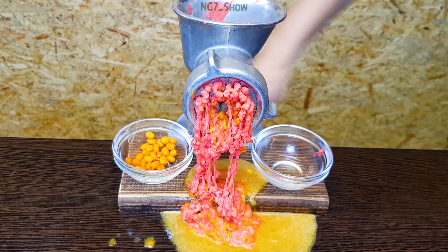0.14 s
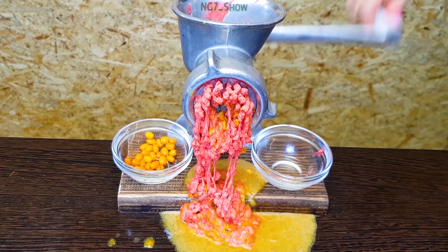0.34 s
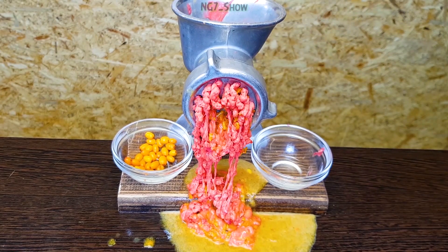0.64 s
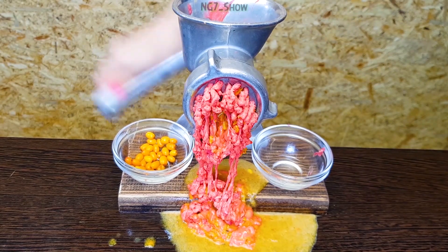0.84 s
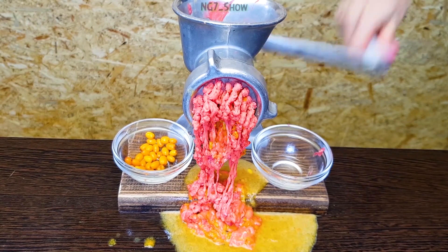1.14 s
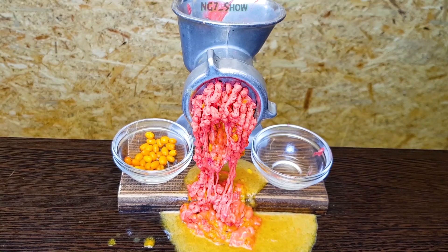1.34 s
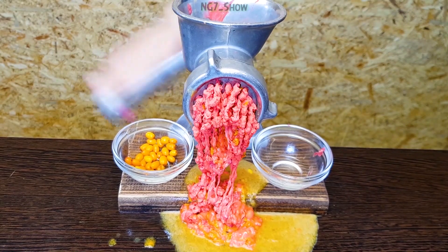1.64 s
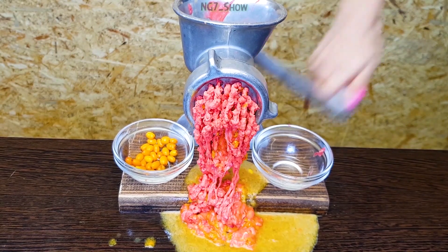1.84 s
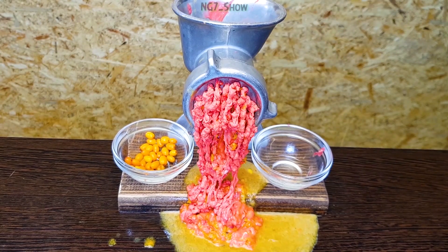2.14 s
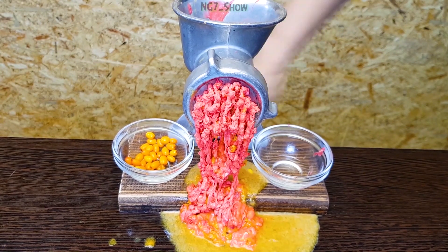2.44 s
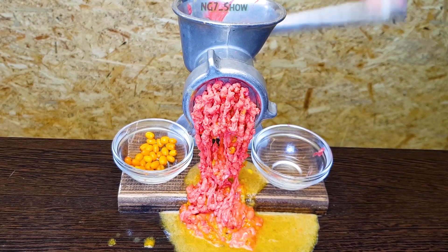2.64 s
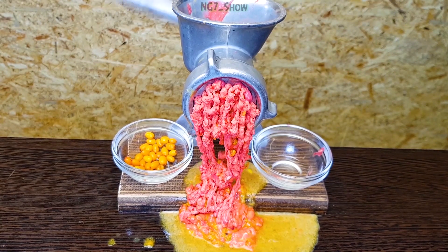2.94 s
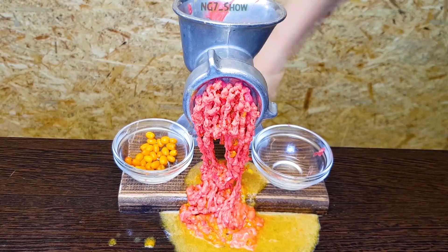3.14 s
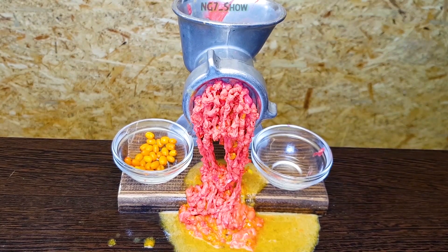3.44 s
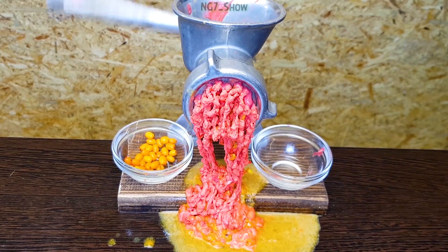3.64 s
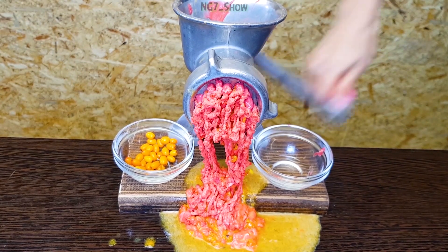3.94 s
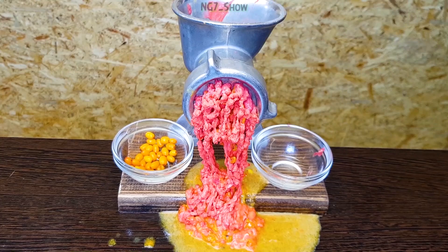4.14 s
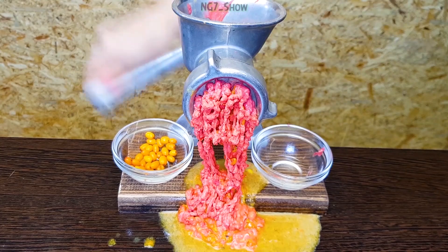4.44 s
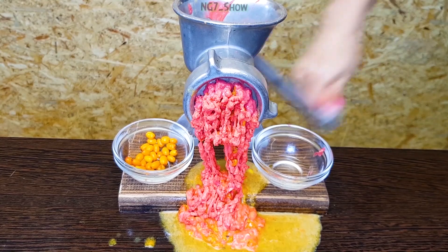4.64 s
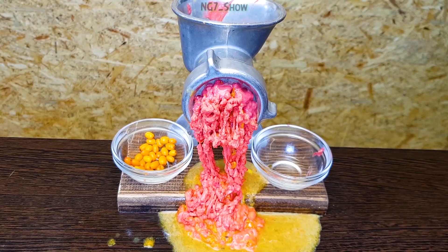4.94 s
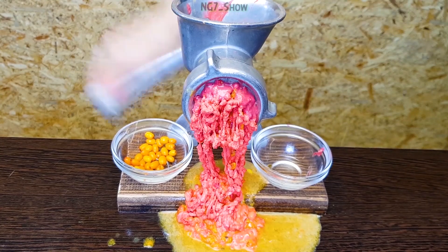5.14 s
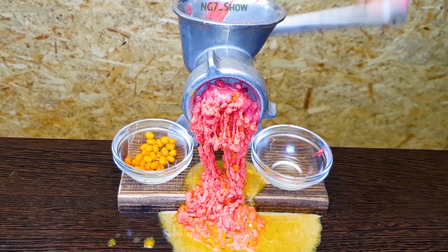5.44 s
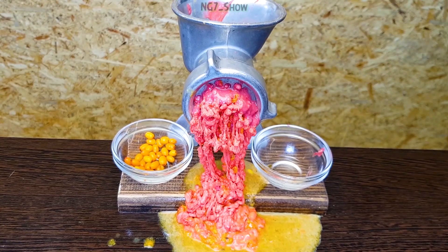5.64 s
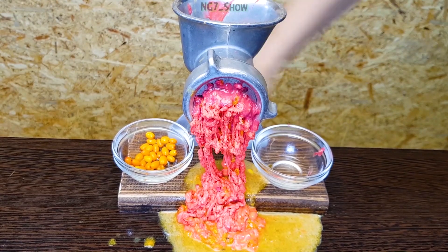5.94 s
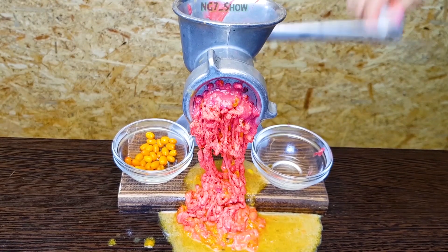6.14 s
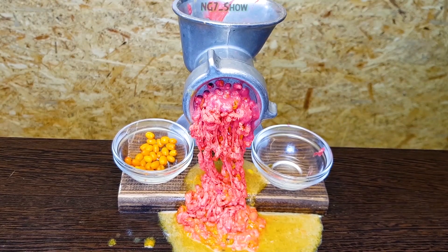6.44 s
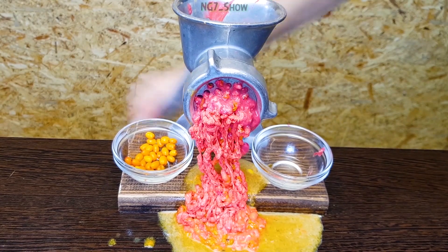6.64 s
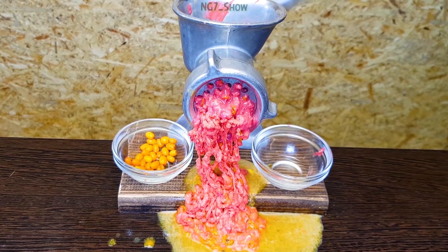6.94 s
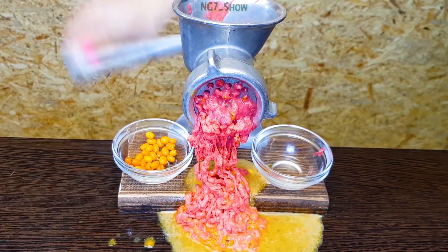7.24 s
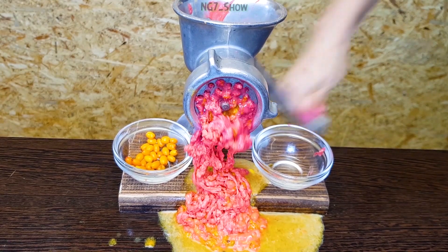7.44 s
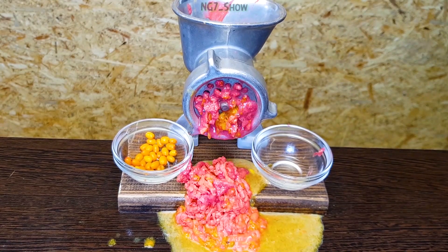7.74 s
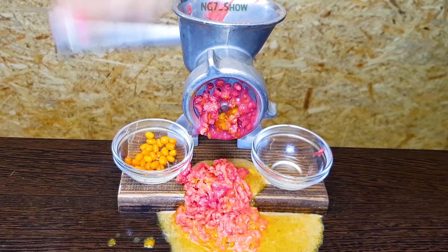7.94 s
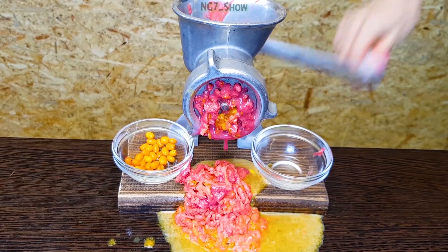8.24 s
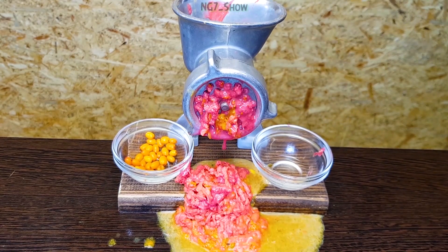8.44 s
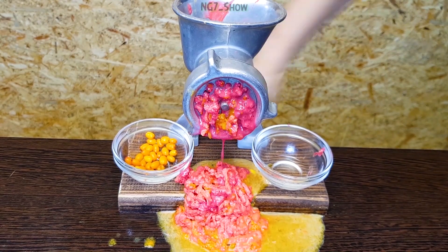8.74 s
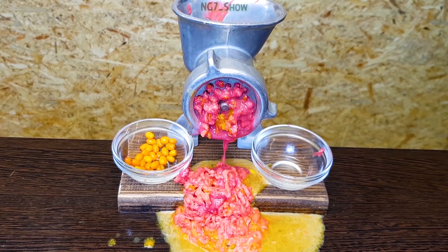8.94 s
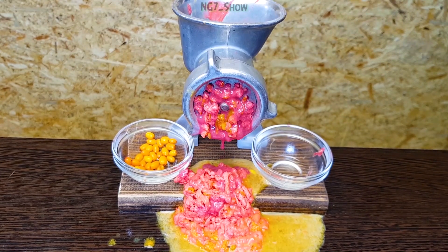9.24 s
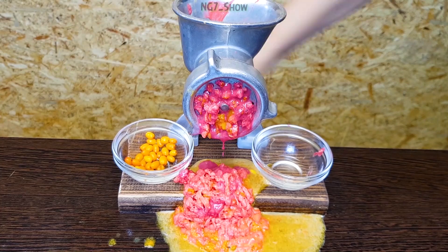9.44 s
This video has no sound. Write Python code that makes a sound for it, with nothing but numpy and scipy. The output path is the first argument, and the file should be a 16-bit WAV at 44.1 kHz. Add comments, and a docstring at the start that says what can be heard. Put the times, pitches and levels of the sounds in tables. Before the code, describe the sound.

Close microphone, small indoor room with a short echo. Sticky slime with hard little beads is forced out of a metal grinder: a wet, hollow scrape, bright fizzing and irregular snaps and pops. Loose crank knocks and low wooden rumbles grow stronger midway as the fizz fades. Toward the end it is sparser, with soft squelches, thin hisses and one strong thump before silence.

```python
"""A wet scrape, sharp snaps and a low tremble open the scene: a hand-cranked metal grinder clamped to a wooden
table pushes beaded slime through its plate, close to a microphone. Resonators driven by noise and pushes give
the table's shake and the barrel's scrape; decaying tones give popping air pockets and snapping beads.
Play in the crank knocks, squeezed slime hisses in narrow bands, and the sound fades out before the end."""
import sys
import numpy as np
from scipy import signal
from scipy.fft import rfft, irfft, next_fast_len
from scipy.io import wavfile
from scipy.ndimage import uniform_filter1d, map_coordinates

SR = 44100
rng = np.random.default_rng(int(sys.argv[2]) if len(sys.argv) > 2 else 0)


def wav_record(signal):
    """Record a signal, one row per channel, as 16-bit PCM in the file named by sys.argv[1]."""
    frames = np.transpose(np.atleast_2d(signal))
    bounded = np.clip(frames, -1, 1)
    # unit amplitude maps onto the largest positive 16-bit level
    quanta = np.round(bounded * 32767).astype(np.int16)
    wavfile.write(sys.argv[1], SR, quanta)


N = 423801

# The screw's steady work. Each row: time in seconds, base levels in dB of barrel scrape, fine crackle
# and table shake.
WORK = [(0.0, -34, -31.5, -39.5), (0.29, -39, -34, -38.5), (1.56, -33, -32, -33), (2.25, -41.5, -42, -34.5),
        (2.85, -37.5, -37, -30), (3.24, -39, -46.5, -48), (3.65, -31.5, -45, -28.5),
        (4.44, -41.5, -55, -39), (4.68, -32, -38, -23.5), (4.97, -44.5, -56, -34.5),
        (5.42, -32.5, -47, -36), (5.62, -34.5, -57, -31.5), (6.19, -47, -67, -53),
        (6.82, -37.5, -42.5, -33.5), (7.39, -43.5, -62, -47), (7.78, -46.5, -59, -37),
        (8.14, -44, -63, -41), (8.62, -52.5, -56, -41.5)]
# Knocks of the crank's play. Each row: start in seconds, relative levels in dB of dull rattle, table thump
# and barrel clack, pitch of the dull rattle in Hz.
KNOCKS = [(0.168, -31, -40, -5.5, 796), (0.928, -23, -45, -19.5, 378), (1.018, -27.5, -45, -22, 373),
          (1.143, -40, -39, -13.5, 745), (1.677, -29, -53, -17.5, 810), (2.097, -27, -36, -24, 208),
          (2.329, -38, -46, -17.5, 607), (2.4, -32, -46, -11, 860), (2.564, -30, -22, -37, 560),
          (2.748, -54, -17, -39, 225), (2.793, -25.5, -2.5, -37, 502), (2.91, -27, -49, -13, 211),
          (3.1, -25.5, -30, -24, 683), (3.298, -34, -30, -47, 202), (3.58, -35, -7, -20, 214),
          (3.647, -23.5, -16, -15, 199), (3.66, -11, -17, -21, 221), (3.918, -26.5, -38, -29.5, 906),
          (4.15, -54.5, -39, -17.5, 216), (4.552, -14.5, -21.5, -27, 220), (4.603, -12, 3, -30.5, 876),
          (4.934, -31, -8.5, -35, 202), (5.121, -25.5, -6, -52, 298), (5.834, -16, -11, -12, 362),
          (6.547, -14, -4, -8, 219), (6.699, -25.5, -25, -21, 225), (6.816, -31, -38, -36, 573),
          (7.038, -25, -24, -20, 203), (7.158, -24, -7, -16.5, 642), (7.872, -32.5, -32, -21, 260),
          (8.005, -30, -39, -11.5, 860), (8.323, -8.5, 9, -10.5, 228)]
# Air pockets bursting in the slime. Each row: start in seconds, relative level in dB, starting pitch in Hz.
POPS = [(0.045, -13, 2290), (0.159, -18.5, 3440), (0.173, -15, 1470), (0.325, -18.5, 1300),
        (0.353, -10, 1470), (0.5295, -9, 2420), (0.6289, -9.5, 2450), (0.7584, -8.5, 2600),
        (0.856, -12, 3070), (0.922, -20.5, 1260), (0.9493, -7, 2720), (1.021, -19.5, 1210),
        (1.1448, -11.5, 2550), (1.4093, -11.5, 1320), (1.499, -18.5, 1230), (1.504, -6, 2280),
        (1.9155, -17.5, 1280), (2.0945, -13.5, 1306), (2.2517, -14, 3140), (2.566, -27.5, 1190),
        (2.6211, -13, 1340), (2.7513, -14, 3150), (2.795, -8, 1315), (3.3545, -12, 1290),
        (3.454, -6.5, 1340), (3.6329, -10, 1770), (3.6614, -9, 1630), (3.832, -14, 2060),
        (3.9212, -0.5, 1980), (4.064, -17, 1880), (4.5438, -15.5, 2790), (4.6049, -5, 1200),
        (4.66, -21.5, 1160), (4.708, -20, 1200), (4.7478, -11, 1290), (4.782, -20, 1300),
        (4.811, -21, 1270), (4.8345, -10.5, 1320), (4.9309, -14, 1300), (5.236, -17, 1730),
        (5.248, -3.5, 1890), (5.3034, -19.5, 1960), (5.3437, -17, 1700), (5.412, -19, 1800),
        (5.421, -18, 1850), (5.466, -21, 1500), (5.5295, -12, 1640), (5.5533, -13.5, 1910),
        (5.8358, -5.5, 1246), (6.209, -17.5, 2750), (6.24, -18.5, 1310), (6.4203, -17, 1870),
        (6.5357, -8, 1240), (6.6658, -19, 2440), (6.6836, -17.5, 1810), (6.7013, -19, 1830),
        (6.821, -15.5, 3300), (6.8418, -14, 1940), (6.877, -22, 2050), (7.037, -11, 1360),
        (7.053, -9, 1340), (7.1578, -21, 970), (7.5939, -16.5, 1310), (7.7067, -12.5, 1310),
        (7.885, -24, 2980), (8.0065, -19, 2340), (8.057, -21, 2300), (8.2422, -23, 1240),
        (8.317, -6.5, 1200), (8.562, -30.5, 1500), (8.6247, -26, 1290)]
# Beads and thin films snapping. Each row: start in seconds, relative level in dB, pitch in Hz,
# top edge in dB relative to that level.
SNAPS = [(0.0253, -7.5, 6400, -29.5), (0.031, -8, 7400, -21.5), (0.133, -6, 6850, -0.5),
         (0.1546, -15, 8650, -10), (0.1678, -8.5, 6400, -16), (0.1777, -8.5, 4080, -23),
         (0.1908, -6.5, 8000, -18.5), (0.4042, -12, 4320, -43), (0.506, -14, 6500, -9),
         (0.597, -12.5, 11500, -5), (0.6011, -8, 6660, -15), (0.618, -6.5, 7400, -15),
         (0.635, -10, 7150, -6), (0.7525, -10, 5700, -30.5), (0.765, -4, 6020, -34),
         (0.7886, -14, 7470, -6), (0.832, -16, 12600, -5), (0.854, -12.5, 10200, -9),
         (0.8566, -7.5, 7750, -19), (0.9229, -7.5, 6800, -6), (0.9455, -15.5, 5900, -1.5),
         (0.984, -20, 6200, -19), (1.0457, -14.5, 8500, -7), (1.1453, -11.5, 6050, -35),
         (1.1855, -17, 6940, -24.5), (1.3463, -18.5, 4260, -6), (1.3848, -10.5, 5260, -17),
         (1.4082, -15, 11750, -4), (1.4325, -14.5, 11000, -9), (1.5299, -23, 10500, 4),
         (1.587, -19.5, 6100, -12), (1.638, -20, 3970, -2), (1.749, -10.5, 3540, -8),
         (1.7985, -17, 5970, -16), (2.2533, -9.5, 4050, -39), (2.5388, -20, 6300, -12),
         (2.5662, -14.5, 4350, -23), (2.754, -11, 6100, -17), (2.7576, -11, 6300, -24),
         (2.8482, -13, 6930, -18), (3.051, -29, 10560, -10.5), (3.1287, -12.5, 6130, -42),
         (3.314, -18, 3330, -40), (3.4118, -16.5, 6370, -10), (3.424, -21.5, 6200, -6),
         (3.526, -18.5, 4100, -42), (3.599, -16, 6300, -33), (3.6154, -18, 7530, -6.5),
         (3.6616, -14.5, 7140, -13), (3.6655, -19, 3960, -14), (3.757, -18.5, 15000, -7.5),
         (3.773, -16.5, 7770, -14), (4.0126, -19.5, 6400, -13), (4.0712, -23, 4260, -42.5),
         (4.176, -25, 4020, -55), (4.547, -18, 7900, -15), (4.6036, -13.5, 3550, -4),
         (4.6245, -10.5, 6100, -18), (4.6445, -19, 3980, -4), (5.054, -29, 9800, -5),
         (5.3644, -34.5, 9600, -10.5), (5.473, -25, 8470, -21.5), (5.5793, -32.5, 9740, -13),
         (5.8352, -21.5, 3600, -41), (6.1737, -33.5, 8630, 0), (6.368, -32, 6650, -28),
         (6.537, -10.5, 3400, -14), (6.5426, -13, 7500, -21), (6.5496, -19, 3720, -9),
         (6.8198, -12, 4120, -42), (6.8416, -28, 3870, -31), (7.038, -16.5, 3470, -44),
         (7.1605, -17.5, 3580, -20), (7.5366, -21.5, 3950, -42), (7.881, -21, 7600, -32),
         (7.884, -26, 6970, -33.5), (8.277, -27, 11200, -8.5), (8.2816, -18.5, 7940, -12),
         (8.318, -7.5, 3560, -10.5), (8.339, -22, 3700, -14.5), ]
# Resonances of the table, the legs' sway first. Each row: frequency in Hz, width in Hz, gain in dB.
TABLE_MODES = [(68.8, 22, 5.5), (135.2, 16, 11.5), (163.6, 27, 4.5), (216.7, 30, -3.5), (353, 61, -15),
               (480, 64, -14)]


def amp(db):
    """Decibels are logarithmic: 20 dB is a factor of ten in amplitude."""
    return 10 ** (np.asarray(db) / 20)


def unit(x):
    """Normalisation by effective value: x at rms 1."""
    return x / np.sqrt(np.mean(x ** 2) + 1e-20)


def along(points, hz):
    """Logarithmic frequency scale: (Hz, value) points interpolated by pitch interval."""
    f, v = np.transpose(points)
    return np.interp(np.log(hz + 1), np.log(f + 1), v)


def curves(rows):
    """Linear interpolation: one value per sample for each column after the time."""
    s, *cols = np.transpose(rows)
    return [np.interp(np.arange(N) / SR, s, c) for c in cols]


def wobble(rate):
    """Slow random modulation: a smooth curve through random knots, rate of them a second."""
    knots = rng.standard_normal(int(N * rate / SR) + 4)
    return map_coordinates(knots, [np.arange(N) * rate / SR])


def swells(base_db, times, peaks_db, rise_s, t60_s):
    """Incoherent sounds add as powers: gain of a steady level plus a quick rise and slow fall per event."""
    t, starts = np.arange(SR // 2) / SR, np.zeros(N)
    np.add.at(starts, np.round(np.asarray(times) * SR).astype(int), amp(peaks_db) ** 2)
    shape = ((1 - np.exp(-t / rise_s)) * amp(-60 * t / t60_s)) ** 2
    event_power = np.abs(signal.fftconvolve(starts, shape)[:N])
    return np.sqrt(amp(base_db) ** 2 + event_power)


def filtered(x, response):
    """Linear filtering: the spectrum of x times a complex response of frequency."""
    m = next_fast_len(N + SR // 2)
    return irfft(rfft(x, m) * response(np.fft.rfftfreq(m, 1 / SR)), m)[..., :N]


def modes(table, size=1):
    """Modal superposition: causal resonances; groups of size move in step and alternate in sign."""
    def response(f):
        total = 0
        for k, (centre, width, db) in enumerate(table):
            damping = 1j * f * width
            total = total + (-1) ** (k // size) * amp(db) * damping / (centre * centre - f * f + damping)
        return total
    return response


def patchy(x, depth_db):
    """Time-varying filtering: x with drifting random patches of gain in time and frequency."""
    z = signal.stft(x, nperseg=256)[2]
    across_pitch = uniform_filter1d(rng.standard_normal(z.shape), size=3, axis=0)
    field = uniform_filter1d(across_pitch, size=24, axis=1)
    return signal.istft(z * amp(depth_db * unit(field)), nperseg=256)[1][:N]


def add(track, s, sound):
    """Superposition: mixes a sound into the track at s seconds."""
    track[round(s * SR):][:len(sound)] += sound


def barrel(x):
    """Cavity radiation: resonances act twice, the small mouth holds back bass, wet walls soak up treble."""
    # Each row: frequency in Hz, width in Hz, gain in dB of one of the two passes.
    barrel_modes = [(1206, 420, 8), (1840, 550, 1.5), (2760, 100, -5), (3650, 380, -7)]
    resonances = modes(barrel_modes, size=2)

    def response(f):
        mouth = 1j * f / (1500 + 1j * f)
        walls = 1 / (1 + 1j * f / 6000) ** 2
        return resonances(f) ** 2 * mouth ** 3 * walls
    return filtered(x, response)


def bubbles(count, low_hz, span, cycles, spread_db, size):
    """Granular superposition: small bursts, each a few rising cycles at its own pitch; the sum has rms 1."""
    when, pitch, chance = rng.random((count, 3)).T
    hz, t = low_hz * span ** pitch[:, None], np.arange(size) / SR
    gain = amp(-spread_db * np.log(0.0077 + chance))[:, None] * np.sqrt(hz)  # a few stand out
    age = t * hz / cycles
    grains = gain * np.sin(2 * np.pi * hz * t * (1 + 0.0053 * age)) * age * np.exp(-age)
    place = (when * N).astype(int)[:, None] + np.arange(size)
    return unit(np.bincount(place.ravel(), grains.ravel(), N + size)[:N])


def grinding():
    """Noise shaped by resonance: pockets squelch in the barrel, thin films tick and hiss at the plate."""
    # Spectrum of the crackle. Each row: frequency in Hz, relative gain in dB.
    crackle_gains = [(1470, -18), (2500, 4.5), (3500, -3), (4700, -8), (6050, -0.5), (8100, -6.5),
                     (9720, -13), (11700, -9.5), (13900, -23), (16500, -34)]
    # Thin rings of the metal plate. Each row: frequency in Hz, width in Hz, gain in dB.
    plate_modes = [(3850, 9.8, -2.5), (6420, 110, 5.5), (7600, 46, 2), (11200, 300, -18.5)]
    scrape_db, crackle_db, _ = curves(WORK)

    # Slime keeps moving after a knock, pop or snap; trail levels are relative to its table level.
    trail_rise_s, squelch_t60_s, fizz_t60_s = 0.00052, 0.15, 0.16
    knock_trail_db, pop_trail_db, snap_trail_db = -9.5, -28.5, -16.5
    bursts = [(s, db + knock_trail_db) for s, db, *_ in KNOCKS]
    bursts += [(s, db + pop_trail_db) for s, db, _ in POPS]
    scraping = swells(scrape_db, *np.transpose(bursts), trail_rise_s, squelch_t60_s)
    s, db, hz, edge_db = np.transpose(SNAPS)
    dull_db = 4 * np.log2(np.minimum(hz / 6000, 1))  # 4 dB lost per octave below 6 kHz
    crackling = swells(crackle_db, s, db + snap_trail_db + dull_db, trail_rise_s, fizz_t60_s)
    # only bright snaps leave a bright trail, 6.5 dB under their top edge
    spitting = swells(crackle_db - 1.5, s, db + edge_db - 6.5, trail_rise_s, fizz_t60_s)

    squelch = bubbles(count=7000, low_hz=853.0, span=5.0, cycles=1.09, spread_db=3.5, size=256)
    squelch = squelch + 2.27 * rng.standard_normal(N)
    scrape = unit(patchy(barrel(squelch), depth_db=3.5))

    ticks = bubbles(count=6000, low_hz=2810, span=4.36, cycles=0.55, spread_db=3.5, size=96)
    # ticks start 3 dB over the hiss and lose 0.094 dB for each dB that the crackle falls
    ticks_db = 3 + 0.094 * (crackle_db - crackle_db[0])
    fizz = amp(ticks_db) * ticks + rng.standard_normal(N)
    fizz = fizz + amp(-4.5) * filtered(fizz, modes(plate_modes))
    coloured = filtered(fizz, lambda f: amp(along(crackle_gains, f)) * np.minimum(f / 1500, 1) ** 3)
    crackle = unit(patchy(coloured, depth_db=3.2))
    low = filtered(crackle, lambda f: 1 / (1 + (f / 8300) ** 10))
    high = crackle - low
    scrape_part = scraping * amp(0.99 * wobble(17)) * scrape
    return scrape_part + amp(2.8 * wobble(20)) * (crackling * low + spitting * high)


def shake():
    """Forced vibration: uneven load makes the legs sway and the board hum, rung anew by each jolt."""
    # The crank catches and jerks the table. Each row: start in seconds, relative levels in dB of
    # board hum and leg sway.
    jolts = [(0.561, -25.5, -30.5), (0.684, -28, -31), (1.362, -16.5, -22), (1.909, -22, -31),
             (2.08, -17.5, -28), (2.298, -26, -42), (2.585, -21.5, -34), (2.794, -11.5, -40),
             (2.921, -13.5, -32), (3.001, -16.5, -40), (3.083, -25.5, -28), (3.157, -20.5, -29),
             (3.302, -16.5, -40), (3.359, -20.5, -24), (3.456, -9, -29), (3.628, -15, -14.5),
             (3.679, -8.5, -22), (4.15, -9, -20), (4.269, -15.5, -31.5), (4.552, -13, -17.5),
             (4.614, -4, -16), (4.771, -17, -28), (4.808, -23, -39), (4.932, -28, -24), (5.048, -23.5, -32),
             (5.12, -22.5, -29), (5.675, -17.5, -28.5), (5.833, -15.5, -38.5), (6.037, -24, -47),
             (6.168, -20, -33.5), (6.233, -30.5, -32.5), (6.438, -27, -50), (6.543, -9, -22),
             (6.693, -19, -31), (6.923, -22.5, -30), (7.043, -16.5, -35), (7.178, -28, -54),
             (7.467, -23, -34.5), (7.592, -22.5, -32), (7.709, -19, -31), (7.859, -21, -41),
             (8.344, -11.5, -23), (8.627, -22, -29.5), (8.692, -18.5, -47)]
    load_db = curves(WORK)[-1]
    s, hum_db, sway_db = np.transpose(jolts)

    legs, board = modes(TABLE_MODES[:1]), modes(TABLE_MODES[1:3])
    upper = modes(TABLE_MODES[3:] + [(945, 350, -28.5)])
    sway = unit(filtered(rng.standard_normal(N), lambda f: legs(f) / (1 + (f / 130) ** 2)))
    hum = unit(filtered(rng.standard_normal(N), lambda f: board(f) / (1 + (f / 230) ** 4)))
    creak = unit(filtered(rng.standard_normal(N), upper))
    lumps = amp(-18.5 + 5.6 * wobble(7.2))  # upper board modes answer in lumps

    ring_hum_db, ring_sway_db = 44.5, 52  # push gain that rings board and legs at a jolt's level
    pushes = np.zeros((2, N))
    pushes[:, np.round(s * SR).astype(int)] = amp([hum_db + ring_hum_db, sway_db + ring_sway_db])
    push_s = 0.0047  # a push spans about four time constants of its smoothing
    soft = lambda f: 1 / (1 + 2j * np.pi * f * push_s / 4) ** 2
    board_ring = filtered(pushes[0], lambda f: board(f) * soft(f))
    leg_ring = filtered(pushes[1], lambda f: legs(f) * soft(f))

    # steady shares of the load are -4.5 and -4 dB; the trembling after a jolt is 2 and -4.5 dB re the jolt
    rise_s, t60_s = 0.012, 0.33
    swaying = swells(load_db - 4.5, s, sway_db + 2, rise_s, t60_s)
    humming = swells(load_db - 4, s, hum_db - 4.5, rise_s, t60_s)
    return board_ring + leg_ring + swaying * sway + humming * (hum + lumps * creak)


def snaps():
    """Sudden release of tension: a few milliseconds of ragged ring at one pitch, with a thin treble edge."""
    out, edge, t = np.zeros(N + SR), np.zeros(N + SR), np.arange(SR // 14) / SR
    sizzle_db, sizzle_t60_s = -19, 0.12  # narrow hiss left at the snap's own pitch
    for s, db, hz, edge_db in SNAPS:
        noise = rng.standard_normal((2, len(t)))
        ragged = unit(uniform_filter1d(uniform_filter1d(noise[0], size=16), size=16))
        flutter = 1 + 0.3 * ragged
        shape = (1 - np.exp(-t / 0.00029)) ** 2 * amp(db - 60 * t / 0.0052)
        sizzle = amp(db + sizzle_db - 60 * t / sizzle_t60_s) * np.minimum(t * 1000, 1) * ragged
        click = amp(db + 5.0) * hz * t * np.exp(-hz * t / 0.69)  # the first cycle or two stand out
        add(out, s, (amp(5.5) * shape * flutter + click + sizzle) * np.sin(2 * np.pi * hz * t))
        edge_shape = amp(db + edge_db + 4.0 - 60 * t / 0.015) * (1 - np.exp(-t / 0.00034))
        add(edge, s, edge_shape * noise[1])
    treble = signal.butter(3, [9000, 13800], "band", fs=SR, output="sos")
    return out[:N] + signal.sosfilt(treble, edge)[:N]


def pops():
    """Damped bubble oscillation: a bursting pocket rings a few rising cycles and nudges the barrel."""
    out, nudge, t = np.zeros(N + SR), np.zeros(N), np.arange(SR // 16) / SR
    for s, db, hz in POPS:
        age = t * (hz / 1300) ** 1.2 / 0.0014  # small pockets die much sooner
        tone = np.sin(2 * np.pi * hz * t * (1 + 3.0 * t) + rng.uniform(0, 2 * np.pi))
        add(out, s, amp(db + 6.5) * age * np.exp(-age) * tone)
        nudge[round(s * SR)] += amp(db + 15.5)
    return out[:N] + barrel(nudge)


def knocks():
    """Impact excitation: a knock thumps the table, clacks in the barrel and leaves a dull rattle and gulp."""
    thump, clack, rattle = np.zeros(N), np.zeros(N + SR), np.zeros(N + SR)
    t = np.arange(SR // 8) / SR
    gulp_db, gulp_t60_s = 4.5, 0.059  # pitched part of the rattle re its noise
    gulp_sag = 2.7  # per second; in the phase, so the pitch falls at twice this share
    for s, db, thump_db, clack_db, hz in KNOCKS:
        burst = rng.standard_normal((2, len(t)))
        # parts rebound unevenly: a new random gain every 128 samples
        steps = np.repeat(rng.standard_normal(len(t) // 128 + 1), 128)[:len(t)]
        chatter = amp(1.82 * steps)
        dull = signal.butter(2, [hz / 1.3, max(hz * 1.4, 750)], "band", fs=SR, output="sos")
        add(thump, s + 0.0035, amp(thump_db + 28.5) * np.hanning(60) / 30)  # a soft push through the clamp
        add(clack, s, amp(clack_db + 2.5 - 60 * t / 0.031) * chatter * burst[0])
        gulp = amp(gulp_db - 60 * t / gulp_t60_s) * np.sin(2 * np.pi * hz * t * (1 - gulp_sag * t))
        loose = unit(signal.sosfilt(dull, burst[1])) * amp(-60 * t / 0.11)
        add(rattle, s, amp(db - 4.5) * (gulp + loose) * (1 - np.exp(-t / 0.0024)))
    return filtered(thump, modes(TABLE_MODES)) + barrel(clack[:N]) + rattle[:N]


def room(x):
    """Frequency-dependent reverberation: each band dies at its own speed; the tail is redrawn every third
    of a second."""
    # Each row: frequency in Hz, time to fall 60 dB in seconds.
    decay_times = [(450, 0.11), (1100, 0.29), (3000, 0.18), (8000, 0.12), (14000, 0.047)]
    out, hop = np.zeros(N + SR), SR // 3
    for start in range(0, N, hop):
        hz, t, z = signal.stft(rng.standard_normal(SR // 4), SR, nperseg=128)
        decay = amp(-60 * t / along(decay_times, hz)[:, None])
        tail = signal.istft(z * decay, SR, nperseg=128)[1]
        answer = signal.fftconvolve(x[start:start + hop], tail / np.linalg.norm(tail))
        add(out, start / SR + .003, answer)
    return out[:N]


def squeezes():
    """Flow noise through a gap: a narrow, sputtering hiss that starts quickly and thins out."""
    # Each row: start in seconds, length in seconds, pitch in Hz, level in dB before shaping.
    gaps = [(4.506, 0.057, 2640, -31), (4.553, 0.069, 3630, -38), (4.612, 0.1, 1176, -26),
            (4.657, 0.12, 3700, -38), (4.809, 0.014, 3690, -31), (5.291, 0.093, 4900, -47.5),
            (6.69, 0.36, 5300, -54.5), (6.839, .11, 3530, -44), (7.843, 0.057, 2850, -39.5),
            (8.178, .035, 4820, -44), (8.468, 0.026, 3150, -50), (8.606, 0.05, 3430, -49)]
    half_width = 0.061  # half the band, as a share of the pitch
    out = np.zeros(N + SR)
    for s, length, hz, db in gaps:
        noise = rng.standard_normal(SR // 3)
        u = np.arange(SR // 3) / SR / length  # 0 to 1 through the squeeze
        edges = [hz / (1 + half_width), hz * (1 + half_width)]
        gap = signal.butter(2, edges, "band", fs=SR, output="sos")
        shape = np.clip(np.minimum(10 * u, 2 - 2 * u), 0, 1)
        add(out, s, amp(db) * unit(signal.sosfilt(gap, noise)) * shape)
    return out[:N] * unit(amp(3 * wobble(90)))  # uneven sputter


def scene():
    """Superposition of sources: everything at the grinder, with the room answering the sharp sounds."""
    crisp, wet, heavy = snaps(), pops(), knocks()
    answer = room(amp(-4.0) * heavy + amp(-11.0) * wet + amp(-14.0) * crisp)
    return (grinding() + shake() + crisp + wet + heavy + squeezes() + answer)[None]


def record(dry):
    """Band limiting and soft saturation: deepest bass and top treble drop, peaks flatten, the end fades."""
    # Start and end of the fade to silence, in seconds.
    fade_times = (8.77, 8.8)
    colour = lambda hz: 1 / np.sqrt((1 + (42 / (hz + 1)) ** 6) * (1 + (hz / 14500) ** 12))
    heard, top = filtered(dry, colour), .76
    squeezed = heard / (1 + np.abs(heard / top) ** 6) ** (1 / 6)
    fade = np.interp(np.arange(N) / SR, fade_times, [1, 0])
    top_hz = 16600  # nothing passes above
    return filtered(squeezed * fade ** 2, lambda hz: hz < top_hz) * (fade > 0)


dry = scene()
out = record(dry)
wav_record(out)
```